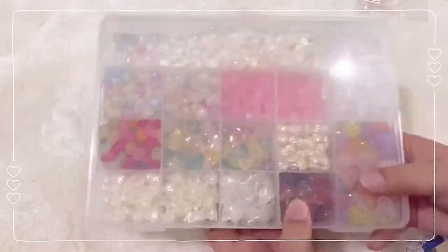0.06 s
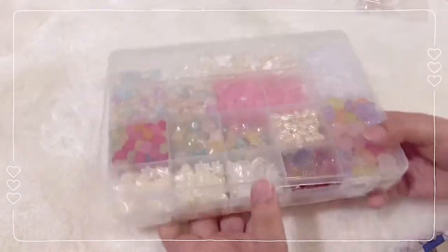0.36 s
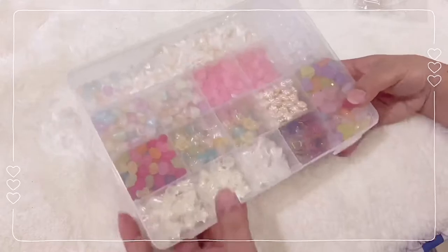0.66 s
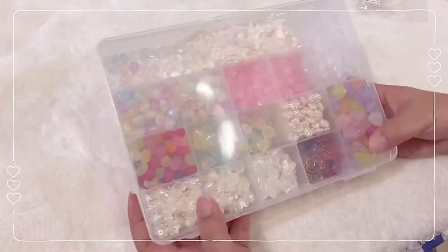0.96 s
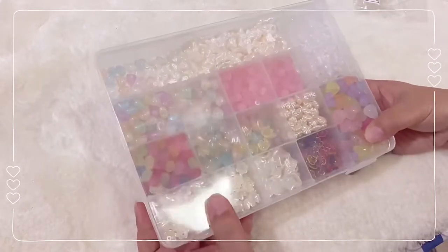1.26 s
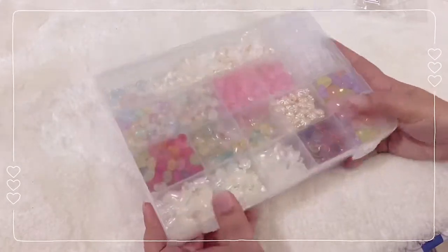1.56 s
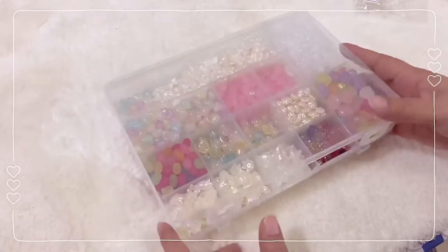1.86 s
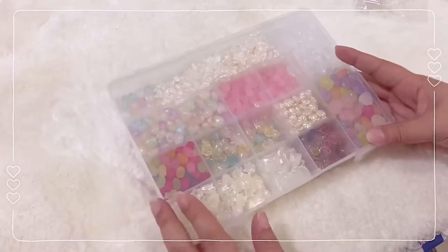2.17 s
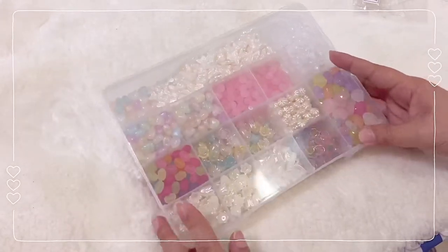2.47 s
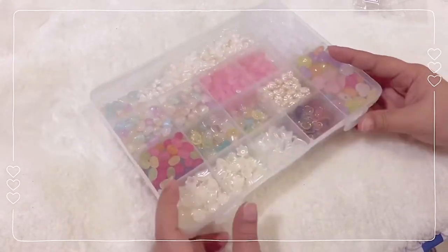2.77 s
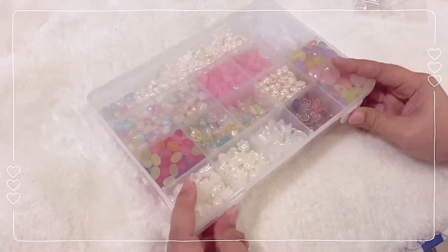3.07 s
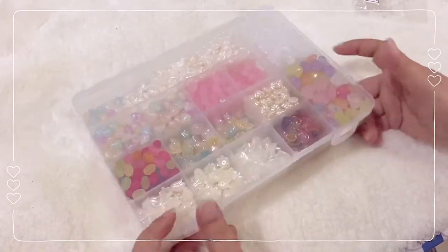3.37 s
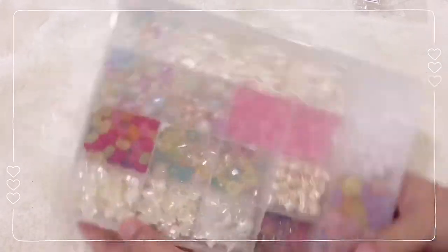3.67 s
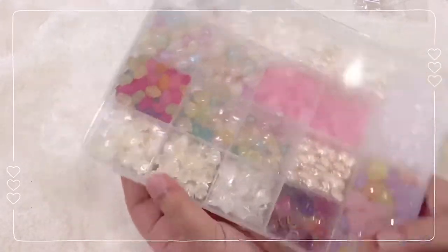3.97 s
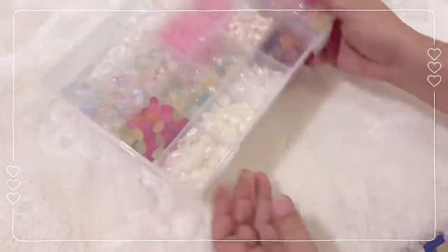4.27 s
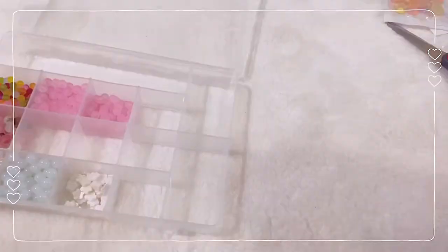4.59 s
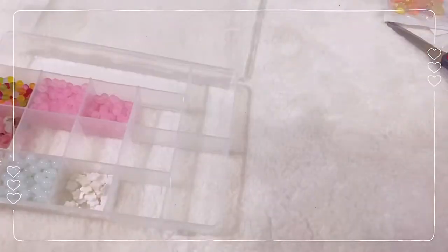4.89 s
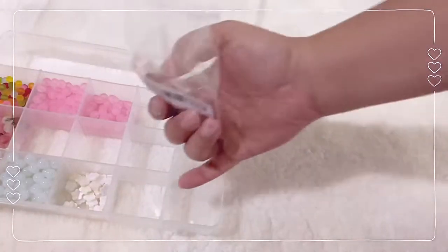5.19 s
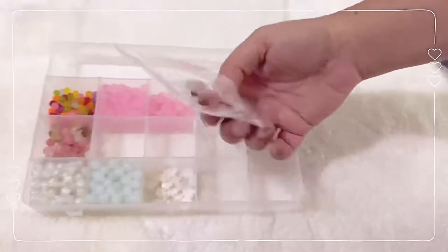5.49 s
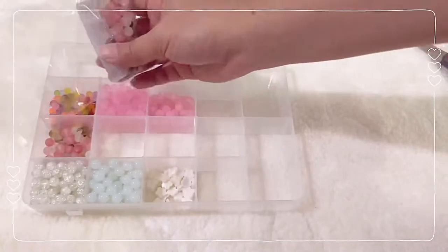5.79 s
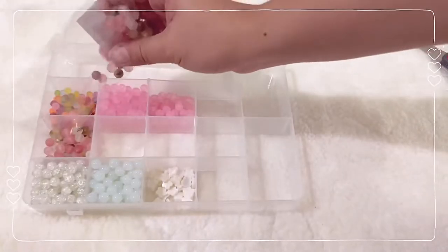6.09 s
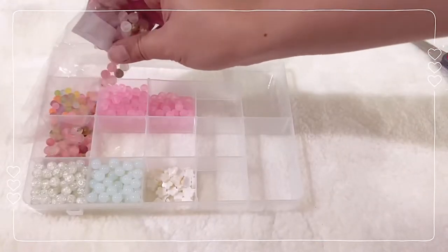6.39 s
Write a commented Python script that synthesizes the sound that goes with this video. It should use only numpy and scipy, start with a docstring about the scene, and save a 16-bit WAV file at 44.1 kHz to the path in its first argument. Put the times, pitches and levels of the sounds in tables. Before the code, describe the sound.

A plastic box of beads clicks and snaps as it is handled, then a thin bag crinkles and beads patter into an open box.

```python
"""A plastic organiser full of beads is turned on a soft rug and its lid pressed shut. Each latch slips
with a crack, and the impulse excites the damped modes of panel and lid. Beads slide and tick in their
compartments, hands rub, and fingertips creak by stick-slip friction. Then a thin bag crinkles as its film
buckles, and beads tumble from it into an open box, each impact followed by one rebound. The room is
small and dry, with a low rumble and a faint hum."""
import sys
import numpy as np
from scipy import signal
from scipy.fft import rfft, irfft
from scipy.io import wavfile

SR = 44100
rng = np.random.default_rng(int(sys.argv[2]) if len(sys.argv) > 2 else 0)


def materialize(psi):
    """Save the field psi as 16-bit PCM at rate SR to the path in sys.argv[1].

    A 1-D psi becomes a single channel; in a 2-D psi each row is a channel.
    """
    bounded = np.clip(np.atleast_2d(psi).T, -1, 1)
    quanta = np.round(bounded * 32767).astype(np.int16)
    wavfile.write(sys.argv[1], SR, quanta)


N = 293265
TIME = np.arange(N) / SR
FFT_SIZE = 4096

# Room noise spectra, before and after the background changes at 4.58 s: frequency_hz, gain_db
AIR_BEFORE = [(25, -17.5), (50, -26.5), (62, -15.5), (80, -1.5), (140, 3), (190, -9.5), (400, -15),
              (700, -20.5), (1400, -27.5), (3000, -27), (5300, -35), (5900, -46), (11000, -45),
              (15000, -59)]
AIR_AFTER = [(25, -20), (60, -30), (100, 8.5), (140, 5.5), (220, 0.5), (400, -9), (800, -28),
             (2000, -21.5), (6000, -31.5), (12000, -58)]
# Likeness of the room's sound at the two ears: frequency_hz, coherence_ratio
EAR_COHERENCE = [(100, 0.89), (300, 0.83), (640, 0), (1400, .05)]
# Reverberation time of the room: frequency_hz, t60_s
REVERB_TIMES = [(200, 0.067), (600, 0.16), (1500, 0.16), (4000, 0.13), (10000, .2), (16000, 0.05)]
# Spectrum of the reverberation: frequency_hz, gain_db
REVERB_SPECTRUM = [(150, 5), (400, -3.5), (800, -6), (1600, -0.5), (4000, -0.5), (12000, 0.5)]
# Hum tones, and the faint ring after a knock: start_s, end_s, pitch_hz, level_db, waver_ratio
FAINT_TONES = [(0, 4.58, 73.5, -54.5, .012), (0, 4.58, 116, -62, .1), (4.9, 6.65, 102.3, -55.5, .003),
               (4.58, 6.65, 209.9, -64.5, .005), (4.58, 5.2, 484.5, -73, .003)]
# Beads sliding, and faint dull rubs of handling: peak_s, decay_s, level_db
SLIDES_AND_RUBS = [(0.021, 0.09, -55), (0.776, 0.18, -62.5), (1.6, 0.038, -46.5), (2.71, 0.33, -58),
                   (3.734, 0.033, -32), (3.859, 0.0093, -58.5), (4.107, 0.021, -37.5), (4.384, .016, -56.5),
                   (4.46, 0.041, -57.5)]
# Spectrum of the sliding hiss: frequency_hz, gain_db
SLIDE_SPECTRUM = [(900, -10), (1600, -3), (2500, 2.5), (4300, -1.5), (6000, -4.5), (9000, -6.5),
                  (12500, -15.5), (14500, -26), (16000, -71)]
# Normal modes of the box: frequency_hz, bandwidth_hz, gain_db
BOX_MODES = [(495, 98, 5), (616, 120, -5.5), (699.7, 99, 4.5), (865, 110, 2), (923, 44, -13),
             (1240, 300, -4), (1415, 180, -12), (1770, 120, -10), (2000, 300, -2)]
# Fingers creaking on the lid: peak_s, decay_s, level_db
FINGER_CREAKS = [(.1, 0.012, -49.5), (.317, 0.0073, -49), (.347, 0.029, -49), (.89, 0.0087, -57.5),
                 (2.565, 0.0036, -38.5), (2.94, 0.024, -50)]
# Spectrum of a slip or tap on the plastic: frequency_hz, gain_db
CRACK_SPECTRUM = [(500, -15.5), (1100, -2.5), (1700, -1.5), (2300, -7), (2900, -6), (3800, -11.5),
                  (5200, -11), (7000, -17), (10500, -22.5), (13800, -26), (15500, -43.5)]
# Single beads and fingernails tapping the box: start_s, level_db
LIGHT_TAPS = [(.213, -38), (.394, -35.5), (.96, -40.5), (1.856, -44), (4.345, -40)]
# Snaps and knocks of the box, and one low thump of the bag: start_s, pitch_hz, knock_db, crack_db
KNOCKS = [(.438, 833, -25, -27), (0.4487, 910, -31, -20), (1.537, 840, -50, -45), (1.7438, 804, -21, -36),
          (1.9059, 1060, -25.5, -33.5), (1.9985, 1185, -37, -50), (2.101, 918, -23.5, -25.5),
          (2.162, 916, -22.5, -16), (2.2717, 808, -18, -19.5), (2.464, 755, -37.5, -38),
          (2.48, 722, -21.5, -18.5), (2.997, 651, -12, -29.5), (3.234, 740, -50.5, -55),
          (3.342, 598, -40.5, -50.5), (3.495, 645, -54, -44), (3.935, 499, -55.5, -51.5),
          (4.596, 471, -47.5, -80), (5.271, 518, -55.5, -52)]
# The sharpest buckles of the bag: start_s, level_db
BAG_CRINKLES = [(4.7623, -30), (4.8572, -22.5), (4.8685, -19), (4.9314, -14), (4.9359, -12), (4.9492, -16),
                (5.1749, -30), (5.205, -27.5), (5.2432, -20.5), (5.2862, -27), (5.4343, -28), (5.5436, -31),
                (5.5908, -28.5)]
# Squeezes of the bag in the hand: peak_s, decay_s, level_db
BAG_SQUEEZES = [(4.866, 0.019, -32), (4.94, .022, -30), (5.03, 0.057, -46), (5.205, 0.027, -50),
                (5.278, .035, -47), (5.525, 0.059, -37), (5.765, 0.089, -45), (5.935, 0.022, -41),
                (6.07, 0.078, -41.5), (6.225, 0.1, -40)]
# Spectrum of the thin film: frequency_hz, gain_db
FILM_SPECTRUM = [(200, -6), (600, 0.5), (1000, -5.5), (2500, -2.5), (4000, -1), (7500, -2.5), (11000, -4),
                 (13500, -0.5), (15500, -1.5), (16500, -27)]
# Beads landing in the open box: start_s, level_db
BEAD_LANDINGS = [(6.2946, -9), (6.3911, -12), (6.3963, -12), (6.4179, -12), (6.4263, -15.5), (6.4302, -14),
                 (6.4694, -13.5), (6.4847, -14.5), (6.5176, -14), (6.5349, -14.5), (6.5404, -15.5),
                 (6.5504, -19), (6.5644, -15.5), (6.6048, -19), (6.6298, -17)]
# Spectrum of a landing bead: frequency_hz, gain_db
BEAD_SPECTRUM = [(240, -48), (400, -9), (858, -5.5), (1080, -14.5), (1730, -6.5), (2760, -7), (3590, 1),
                 (5140, -6), (6190, 1.5), (7820, -7), (9720, -2.5), (14600, -6.5), (15700, -13),
                 (16500, -50)]


def amp(db):
    """Amplitude ratio of a level in decibels."""
    return 10 ** (np.asarray(db) / 20)


def unit_rms(x):
    """Normalisation to unit mean power."""
    return x / np.sqrt(np.mean(x ** 2) + 1e-20)


def curve_at(points, hz):
    """Interpolation on a logarithmic frequency axis."""
    f, value = np.transpose(points)
    return np.interp(np.log(hz + 1), np.log(f + 1), value)


def swells(rows, rise_share, steepness=1):
    """Incoherent movements add in power; each rises in a share of its decay time."""
    power = np.zeros(N)
    for peak_s, decay_s, db in rows:
        near = abs(TIME - peak_s) < 10 * decay_s
        away = np.maximum((peak_s - TIME[near]) / rise_share, TIME[near] - peak_s) / decay_s
        power[near] += amp(db) ** 2 * np.exp(-2 * away ** steepness)
    return np.sqrt(power)


def add(mix, start_s, sound):
    """Superposition of a sound on the mix."""
    part = mix[:, max(round(start_s * SR), 0):][:, :sound.shape[-1]]
    part += sound[..., :part.shape[1]]


def colour(x, db_at):
    """Minimum-phase filtering, with the gain in decibels given as a function of frequency."""
    hz = abs(np.fft.fftfreq(FFT_SIZE, 1 / SR))
    log_gain = np.log(np.maximum(amp(db_at(hz)), 1e-5))
    taps = np.fft.ifft(np.exp(np.conj(signal.hilbert(log_gain)))).real[:FFT_SIZE // 2]
    return signal.oaconvolve(x, taps[None], axes=1)[:, :x.shape[1]]


def shaped(x, spectrum):
    """Source and filter: an excitation takes on a spectrum, at unit power."""
    return unit_rms(colour(x, lambda f: curve_at(spectrum, f)))


def resonance(hz, centre_hz, width_hz):
    """Complex response of a damped oscillator."""
    return 1j * hz * width_hz / (centre_hz ** 2 - hz ** 2 + 1j * hz * width_hz)


def grains(per_s, spread_db):
    """Shot noise: random impacts of uneven size, each a decaying burst that differs between the ears."""
    sizes = amp(spread_db * np.minimum(rng.exponential(1, N), 3.5))
    impacts = sizes * (rng.random(N) < per_s / SR)
    decay = np.exp(-np.arange(FFT_SIZE // 16) / SR / 0.0013)
    return signal.oaconvolve(impacts, decay)[:N] * rng.standard_normal((2, N))


def clicks(rows, spectrum, centre_hz, scatter_octaves, ring_s, focus_db, lead_s, left_db):
    """Brief impacts are broadband; each has a random spectral centre and pan, and the left ear leads."""
    mix, t = np.zeros((2, N)), np.arange(FFT_SIZE // 4) / SR
    for start_s, level_db in rows:
        own_hz = centre_hz * 2 ** (scatter_octaves * rng.uniform(-1, 1))
        burst = rng.standard_normal((2, len(t))) * t / ring_s * np.exp(-t / ring_s)
        burst += .3 * burst[::-1]  # partly shared by the ears
        burst[1] = np.interp(t - round(lead_s * SR) / SR, t, burst[1], left=0)
        click = colour(burst, lambda f: curve_at(spectrum, f) - focus_db * np.log2((f + 1) / own_hz) ** 2)
        pan_db = left_db + 2.8 * rng.standard_normal()
        ear_gains = amp(level_db + np.array([[pan_db], [-pan_db]]) / 2)
        add(mix, start_s + 0.0002, click / abs(click).max() * ear_gains)
    return mix


def cohere(spectra, hz):
    """Interaural coherence: the right ear shares the left ear's bass (in place)."""
    shared = np.clip(curve_at(EAR_COHERENCE, hz), 0, 1)
    spectra[1] = shared * spectra[0] + np.sqrt(1 - shared ** 2) * spectra[1]


def room(x, wet_db):
    """Reverberation: sparse reflections decay exponentially, each band at its own rate."""
    echoes = rng.choice([-1., 1.], (2, SR // 4)) * (rng.random((2, SR // 4)) < .15)
    hz, t, bands = signal.stft(echoes, SR, nperseg=256)
    cohere(bands, hz[:, None] / 2)
    decay = amp(-60 * t / curve_at(REVERB_TIMES, hz)[:, None])
    tail = signal.istft(bands * decay, SR, nperseg=256)[1]
    tail *= np.clip(np.arange(tail.shape[1]) / SR / 0.0011, 0, 1) ** 2  # the first echoes take a moment
    tail = colour(tail / np.linalg.norm(tail[0]), lambda f: curve_at(REVERB_SPECTRUM, f))
    return x + amp(wet_db) * signal.fftconvolve(x, tail, axes=1)[:, :x.shape[1]]


def room_noise(spectrum, db):
    """Diffuse steady noise, alike at both ears at long wavelengths."""
    hz = np.fft.rfftfreq(N, 1 / SR)
    noise = rfft(rng.standard_normal((2, N)))
    cohere(noise, hz)
    return amp(db) * unit_rms(irfft(noise * amp(curve_at(spectrum, hz)), N)) * amp([[.7], [-.7]])


def air(change_s=4.58, fade_s=.04):
    """Ambient rumble and hiss pass, by a power crossfade, to a quieter air at 4.58 s."""
    late_share = np.clip((TIME - change_s) / fade_s + .5, 0, 1)
    early = room_noise(AIR_BEFORE, db=-54.5)
    late = room_noise(AIR_AFTER, db=-57)
    return np.sqrt(1 - late_share) * early + np.sqrt(late_share) * late


def hum_and_ring(fade_s=.04):
    """Hums and the ring after a knock: pure tones under slow random frequency and amplitude modulation."""
    mix, knots = np.zeros(N), np.linspace(0, N / SR, num=30)
    for start_s, end_s, pitch_hz, db, waver in FAINT_TONES:
        drift, swell = (np.interp(TIME, knots, v) for v in rng.standard_normal((2, len(knots))))
        gate = np.clip(np.minimum(TIME - start_s, end_s - TIME) / fade_s, 0, 1)
        phase = 2 * np.pi * np.cumsum(pitch_hz * (1 + waver * drift)) / SR
        mix += amp(db + 2 * swell) * gate * np.sqrt(2) * np.sin(phase)
    return mix * amp([[.5], [-.5]])


def box_response(hz):
    """Modal superposition: the box responds as the sum of its damped modes."""
    return sum(amp(db) * resonance(hz, f, width) for f, width, db in BOX_MODES)


def slides_and_rubs(body_db=-1, quick_s=0.033, dull_db_per_octave=5.5):
    """Sliding beads and rubbing hands: many tiny contacts radiate hiss and drive the modes of the box."""
    hits, hz = grains(per_s=1500, spread_db=6), np.fft.rfftfreq(N, 1 / SR)
    hiss = shaped(hits, SLIDE_SPECTRUM) * amp([[.9], [-.9]])
    floor = box_response(hz) * resonance(hz, centre_hz=900, width_hz=1000)
    body = unit_rms(irfft(rfft(hits + 0.18 * hits[::-1]) * floor, N))
    mix = np.zeros((2, N))
    for peak_s, decay_s, db in SLIDES_AND_RUBS:
        trickle = (peak_s, decay_s * 3.9, db - 14)  # a fainter, longer swell around the main one
        flow = swells([(peak_s, decay_s, db), trickle], rise_share=0.57, steepness=1.3)
        hiss_db = -dull_db_per_octave * np.log2(decay_s / quick_s)  # longer movements hiss less
        mix += flow * (amp(hiss_db) * hiss + amp(body_db) * body)
    return room(mix, wet_db=-9)


def finger_creaks(tilt_db_per_octave=-1, scrape_db=6):
    """Stick-slip friction of fingertips on the lid gives runs of ticks with a resonant scrape."""
    def gain_db(hz):
        scrape = scrape_db * abs(resonance(hz, centre_hz=2750, width_hz=650))
        return curve_at(CRACK_SPECTRUM, hz) + tilt_db_per_octave * np.log2(hz + 1) + scrape

    ticks = unit_rms(colour(grains(per_s=600, spread_db=4), gain_db))
    return room(ticks * swells(FINGER_CREAKS, rise_share=.8), wet_db=-2.5)


def light_taps():
    """Impacts of single beads and fingernails on the shut box radiate short transients."""
    taps = clicks(LIGHT_TAPS, CRACK_SPECTRUM, centre_hz=4500, scatter_octaves=.3,
                  ring_s=.0006, focus_db=1.2, lead_s=.00005, left_db=1.5)
    return room(taps, wet_db=-7)


def creep(creep_s=.003, creep_db=-20, tilt_db_per_octave=-2):
    """Frictional creep, as when a latch starts to slip: a brief scrape swells into each knock."""
    slips = grains(per_s=3000, spread_db=3)
    scrape = colour(slips + .5 * slips[::-1],
                    lambda f: curve_at(CRACK_SPECTRUM, f) + tilt_db_per_octave * np.log2(f + 1))
    creeps = [(s, creep_s, max(knock_db, crack_db) + creep_db) for s, _, knock_db, crack_db in KNOCKS]
    return unit_rms(scrape) * swells(creeps, rise_share=1)


def panel_response(hz, pitch_hz):
    """A panel resonates at its pitch and one overtone, radiating directly and through the box modes."""
    fundamental, overtone = (resonance(hz, f, 0.43 * pitch_hz) ** 2 for f in (pitch_hz, 1.6 * pitch_hz))
    overtone_gain = amp(-7) * (pitch_hz / 900) ** 2  # a stiffer spot is brighter
    return (fundamental + overtone_gain * overtone) * (1 + box_response(hz))


def bending_wave(response, hz, late_cycles):
    """Dispersion: low bending waves travel more slowly, so a knock chirps downwards."""
    wave = irfft(response * np.exp(-2j * np.pi * late_cycles * np.log(hz + 1)))
    return unit_rms(wave) * signal.windows.tukey(2 * FFT_SIZE, .5)[FFT_SIZE:]


def slip_crack(flex_db, doubling_db=26.5):
    """Stick-slip release: slips crowd together and die out, more slowly the more the lid gives."""
    t = np.arange(FFT_SIZE) / SR
    build_up_s = 0.0013 * 2 ** ((flex_db + 30) / doubling_db)
    slips = rng.standard_normal((2, FFT_SIZE)) * t / build_up_s * np.exp(-t / build_up_s)
    crack = shaped(slips + 0.26 * slips[::-1], CRACK_SPECTRUM)
    crack[0] = np.interp(t - 4 / SR, t, crack[0], left=0)  # the right ear leads
    return crack * amp([[1.2], [-1.1]])


def snaps_and_knocks(soft_hz=733, stiff_db_per_octave=28.5, knock_room_db=-3):
    """Impulse excitation: a latch cracks, the panel knocks, the lid flexes; the bag thumps once alike."""
    mix, hz = np.zeros((2, N)), np.fft.rfftfreq(FFT_SIZE, 1 / SR)
    lid_mode = resonance(hz, centre_hz=365, width_hz=230) ** 2
    for start_s, pitch_hz, knock_db, crack_db in KNOCKS:
        # the lid flexes mostly with the crack, and less at stiff, high-pitched spots
        stiffness_db = stiff_db_per_octave * max(np.log2(pitch_hz / soft_hz), 0)
        flex_db = 0.8 * crack_db + 0.2 * knock_db - stiffness_db
        panel = bending_wave(panel_response(hz, pitch_hz), hz, late_cycles=0.8974)
        knock = amp(knock_db - 8) * panel * amp([[-1.3], [1.2]])
        thud = amp(flex_db - 10) * bending_wave(lid_mode, hz, late_cycles=1.6)
        crack = amp(crack_db - 8) * slip_crack(flex_db)
        # the panel faces the listener, so part of its knock bypasses the room
        add(mix, start_s, knock * (1 - amp(knock_room_db)))
        snap = knock * amp(knock_room_db) + thud + crack
        # every snap gets its own random pattern of echoes
        add(mix, start_s, room(np.pad(snap, ((0, 0), (0, 2 * FFT_SIZE))), wet_db=-3))
    return mix


def crinkling_bag(spray_db=-4, rub_db=-7, crinkle_db=3):
    """Thin film buckles in many tiny snaps and a few sharp ones, over the friction of film on film."""
    spray = amp(spray_db) * shaped(grains(per_s=600, spread_db=7), FILM_SPECTRUM)
    rub = amp(rub_db) * shaped(grains(per_s=4000, spread_db=3), FILM_SPECTRUM)
    rustle = (spray + rub) * swells(BAG_SQUEEZES, rise_share=0.77, steepness=1.1) * amp([[.9], [-.9]])
    crinkles = clicks(BAG_CRINKLES, FILM_SPECTRUM, centre_hz=6000, scatter_octaves=0.28,
                      ring_s=0.00017, focus_db=2.5, lead_s=.00007, left_db=2.5)
    return room(rustle + amp(crinkle_db) * crinkles, wet_db=-11.5)


def pouring_beads(bead_db=3, bounce_s=0.01, bounce_db=-13, jostle_db=-26, settle_s=0.069):
    """Inelastic collisions: each bead lands, rebounds once more weakly and jostles the heap."""
    hops = [(s + bounce_s * rng.uniform(0.55, 1.4), db + bounce_db) for s, db in BEAD_LANDINGS]
    landings = clicks(BEAD_LANDINGS + hops, BEAD_SPECTRUM, centre_hz=8800, scatter_octaves=0.33,
                      ring_s=0.00054, focus_db=1.8, lead_s=.00012, left_db=5.5)
    settling = swells([(s, settle_s, db) for s, db in BEAD_LANDINGS], rise_share=0.016)
    jostle = shaped(grains(per_s=600, spread_db=5), BEAD_SPECTRUM) * settling * amp([[2.5], [-2.5]])
    return room(amp(jostle_db) * jostle + amp(bead_db) * landings, wet_db=-7.5)


def scene():
    """Linear superposition: the pressures of all sources add at each ear."""
    handling = creep() + snaps_and_knocks() + light_taps() + slides_and_rubs() + finger_creaks()
    return handling + crinkling_bag() + pouring_beads() + air() + hum_and_ring()


def record(dry, cutoff_hz=16500):
    """Soft saturation rounds the loudest peaks, and a low-pass filter limits the band."""
    rounded = dry / (1 + dry ** 6) ** (1 / 6)
    low_pass = signal.firwin(255, cutoff_hz, window=("kaiser", 9), fs=SR)
    return signal.oaconvolve(rounded, low_pass[None], "same")


dry = scene()
out = record(dry)
materialize(out)
```